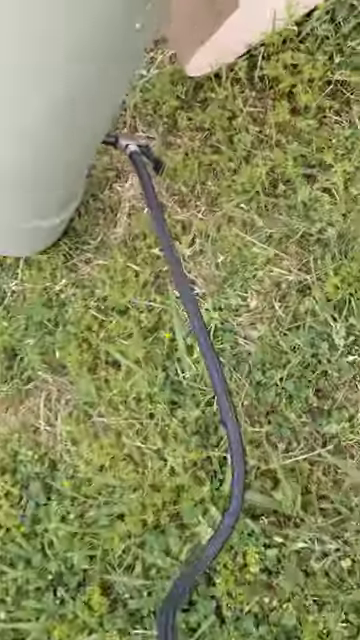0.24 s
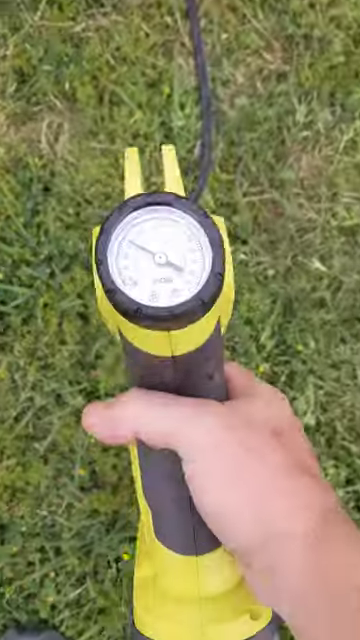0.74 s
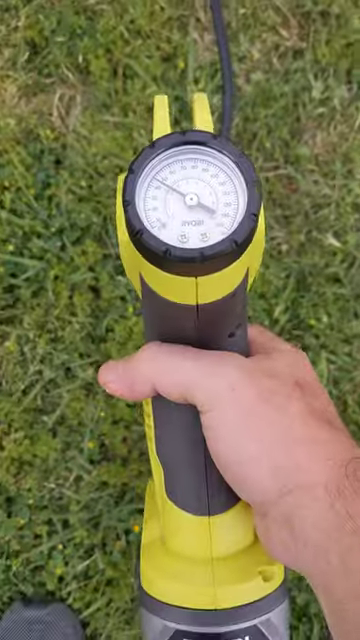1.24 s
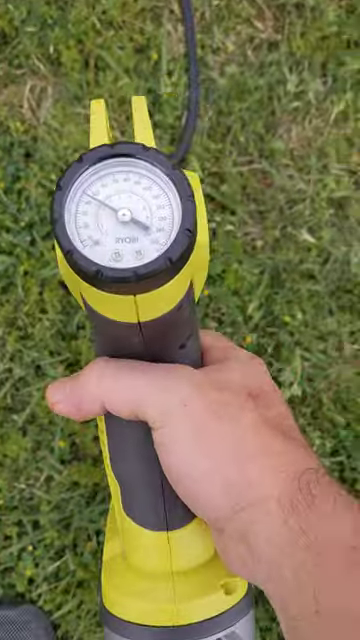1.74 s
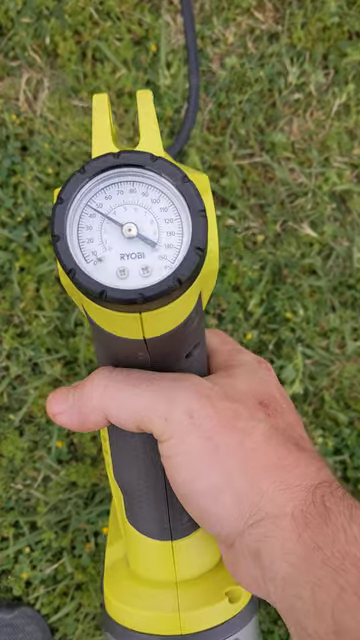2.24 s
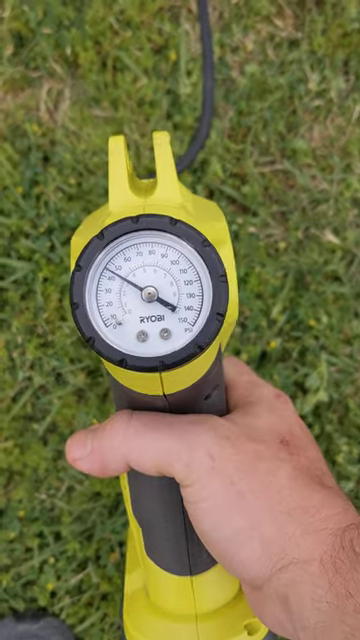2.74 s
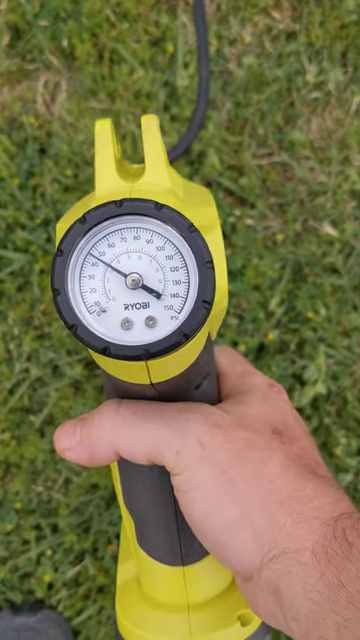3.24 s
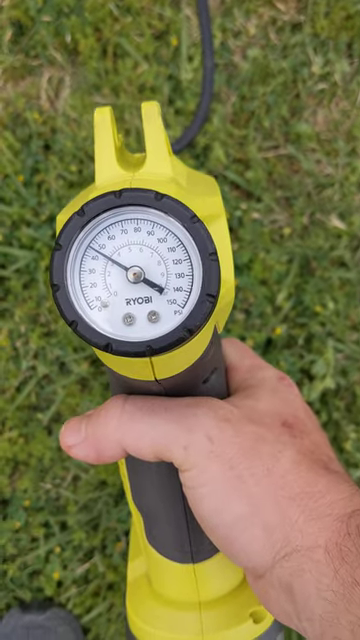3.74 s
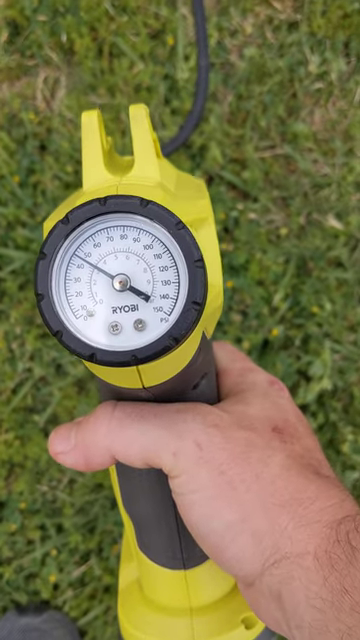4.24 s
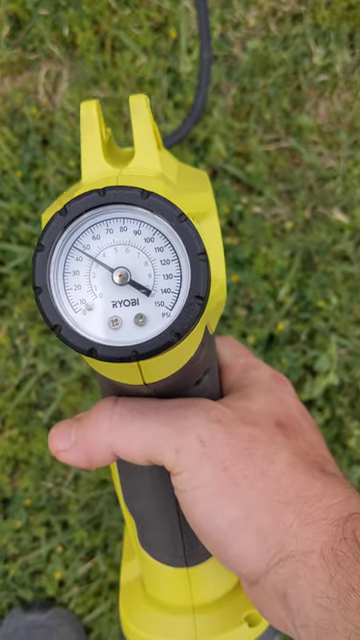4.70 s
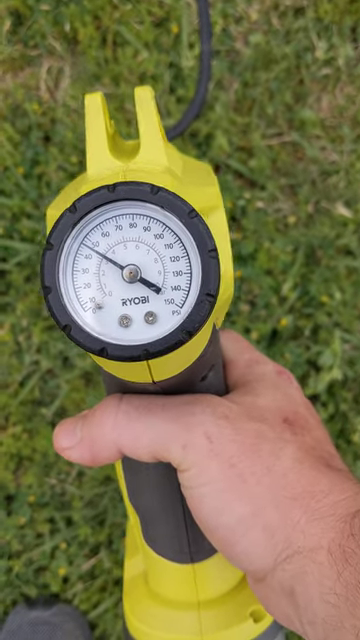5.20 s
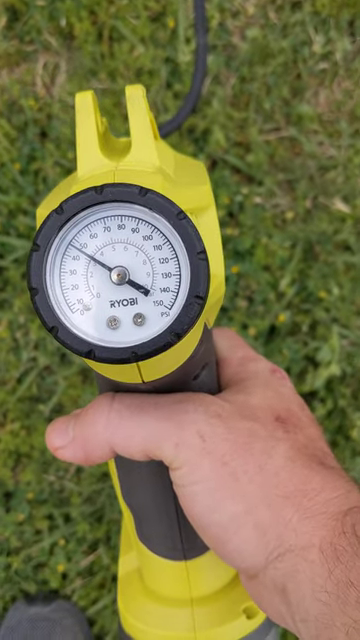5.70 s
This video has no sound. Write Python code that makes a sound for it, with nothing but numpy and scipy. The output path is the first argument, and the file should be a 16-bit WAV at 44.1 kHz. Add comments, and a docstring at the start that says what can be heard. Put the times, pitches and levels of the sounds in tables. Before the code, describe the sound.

Outdoors, a short high hiss leaks from an air hose and dies away as a portable electric air pump starts up. The pump keeps going at one even speed near the microphone, its piston buzzing, gears rattling in a plastic shell and air rushing through. Gusts of wind buffet the microphone throughout, hardest in the first two seconds, and a faint distant drone lies underneath.

```python
"""Air pump on a lawn

Air hisses out where the hose clips on, then a hand-held piston pump starts filling a tank.
Each turn of its crank gives one puff, a round of valve and rod clacks, gear rattle and a surge of hiss.
The pump draws back, then slowly comes nearer. Wind buffets the left and right microphone openings
throughout, over a low, far-off hum."""
import sys
import numpy as np
from scipy.fft import rfft, irfft, next_fast_len
from scipy.io import wavfile
from scipy.ndimage import uniform_filter1d, minimum_filter1d, map_coordinates

SR = 44100
rng = np.random.default_rng(int(sys.argv[2]) if len(sys.argv) > 2 else 0)


def int16_out(signal):
    """Quantize to a 16-bit WAV file."""
    q = np.round(np.clip(np.atleast_2d(signal).T, -1, 1) * 32767)
    wavfile.write(sys.argv[1], SR, q.astype(np.int16))


N = 262836

# Tone of the leak from close by, a little away and far off. Columns: pitch_hz, level_db
LEAK_CLOSE_TONE = [(710, -72), (1200, -36), (3200, -21), (3850, -29), (3970, -17), (4240, -6), (4930, -2),
                   (5980, -9), (6740, -4), (8630, -16), (12600, -22.5), (15800, -24)]
LEAK_AWAY_TONE = [(710, -65), (1200, -27), (2910, -30), (3240, -20), (4240, -19), (4620, -8.5),
                  (5610, -4.5), (6810, -21), (8630, -20), (9210, -30), (11100, -22), (15800, -34)]
LEAK_FAR_TONE = [(290, -66), (500, -28), (2630, -29), (4300, -22), (4690, -11), (5190, -14.5), (5500, -10),
                 (5910, -7), (6260, -12.5), (6540, -17.5), (9250, -27.5), (10200, -23), (11200, -27),
                 (15800, -33)]
# When each of those three tones is heard on its own: time_s
LEAK_TONE_TIMES = [0.068, 0.2, 0.43]
# Gusts of wind on the microphone. Columns: start_s, length_s, left_db, right_db
GUSTS = [(0.0, 0.29, -18.5, -31), (.3, .09, -25.5, -34), (.7, 0.5, -32, -51), (1.03, .1, -9, -25),
         (1.185, 0.078, -27, -21.5), (1.367, 0.11, -27, -27), (1.487, .05, -27, -20.5),
         (1.788, 0.14, -13.5, -37), (1.984, 0.034, -12.5, -28), (2.067, 0.023, -25, -24.5),
         (2.43, 0.043, -25, -36), (2.582, 0.055, -18.5, -27), (2.747, 0.12, -19.5, -38),
         (2.914, 0.041, -14.5, -32), (3.644, 0.018, -19, -35), (3.756, .07, -18, -36),
         (4.609, 0.023, -14, -40), (4.695, 0.16, -20.5, -44), (4.922, 0.28, -21, -42),
         (5.282, 0.073, -20, -44), (5.74, 0.19, -24.5, -42)]
# Tone of the wind's rumble and of the swirls in strong gusts. Columns: pitch_hz, level_db
RUMBLE_TONE = [(22, -42), (40, -10), (60, 4), (130, -2.5), (250, -9.5), (450, -24), (900, -38), (2500, -50)]
SWIRL_TONE = [(80, -3), (300, 2), (500, -4.5), (900, -18.5), (1700, -31), (4000, -65)]
# Sudden slaps of wind on the left side. Columns: start_s, level_db, pitch_hz
SLAPS = [(0.073, 2.5, 200), (0.087, -3, 110), (0.146, -9, 151), (0.242, -1, 172), (0.285, -9, 200),
         (0.468, -15.5, 140), (1.03, 11.5, 115), (1.129, 2.5, 65), (1.78, -6, 130), (1.81, -0.5, 170),
         (1.826, 3, 70), (1.849, -1, 109), (1.887, 10.5, 95)]
# How fast the crank spins. Columns: time_s, turns_per_s
CRANK_SPEED = [(0.7, 35.29), (0.735, 55.13), (0.78, 58.13), (0.85, 59.05), (2, 59.0), (3, 58.94),
               (4, 58.86), (5, 58.81), (5.96, 58.76)]
# How near the pump is (0 is arm's length, 1 is close). Columns: time_s, nearness
NEARNESS = [(0.7, 0.58), (1.1, 0.08), (1.7, 0.12), (2.4, 0.27), (3.1, 0.85), (5.96, 0.89)]
# How the noise swells within one turn. Columns: share_of_turn, rattle_db, hiss_db
TURN_LEVELS = [(0, 7.5, 8), (.15, 10, 1), (.3, 6, 4), (.5, 4.5, 0.5), (.66, 4, 10.5), (.76, 12, 2),
               (.86, -0.5, 9.5), (1, 5, 6.5)]
# Tone of the air rushing through the pump. Columns: pitch_hz, level_db
HISS_TONE = [(3000, -14), (6000, 6.5), (7900, 5), (9000, 4.5), (9800, -0.5), (12300, 0.5), (13100, 2.5),
             (14000, 0.5), (15600, 4)]
# Tone of the gears and motor rattling in the plastic shell. Columns: pitch_hz, level_db
SHELL_TONE = [(150, -1.5), (500, -4), (830, 9.5), (1080, -0.5), (1700, -1), (2200, 4), (2550, 1.5),
              (3100, -6), (3800, -5), (4600, 4), (5800, -1), (6900, -7.5), (9500, -11)]
# Parts that ring when struck; blow_share is how much of the ring comes from the blow, not the gears.
# Columns: pitch_hz, width_hz, far_db, close_db, share_of_turn, blow_share, left_boost_db, left_lag_ms
RINGING_PARTS = [(1374, 570, -4, -4, 0.032, 0.7, 4.5, 0.27), (1892, 87, -6.5, -19.5, .94, 0.35, 2.5, 0.067),
                 (2648, 210, -1.5, -7, 0.019, 1, -3, 0.14), (2825, 240, -4, -4.5, 0.038, 0.52, 2, 0.18),
                 (2660, 310, -7.5, -5, .82, 0.83, -10, 0.11), (3406, 230, -9.5, -6.5, 0.43, 0.32, 1, 0.16),
                 (3600, 180, -10.5, -15, 0.049, 0.51, -1, 0.26),
                 (4132, 390, -5, -6.5, .33, 0.39, -1.5, 0.254), (4510, 120, -25, -6.5, 0.88, 0.61, 6, 0.22),
                 (4939, 206, -3.5, -7, 0.27, 0.33, -4, 0.17), (5300, 134, -21, -8.5, .14, 0.9, 5, 0.19),
                 (6280, 490, -9, -13.5, 0.36, 0.26, 2, 0.2), (7680, 890, -13, -9, 1, 0.22, 2, 0.18),
                 (8650, 210, -27, -16.5, .88, 0.45, 14, 0.14)]
# Tone of one puff through the pump body, on each side. Columns: pitch_hz, level_db
PUFF_LEFT_TONE = [(30, -39), (59, -13), (118, -9.5), (200, -15.5), (310, -8.5), (412, -9), (471, -21.5),
                  (530, -10.5), (650, -5), (766, -5), (825, 0.5), (884, -5), (950, -21.5), (1110, -32.5),
                  (1400, -12.5), (1900, -54.5)]
PUFF_RIGHT_TONE = [(30, -40), (59, -14.5), (118, -13), (220, -18), (400, -11), (530, -7.5), (700, -15.5),
                   (825, -13.5), (1000, -25.5), (1120, -43), (1354, -20), (1590, -17.5), (1800, -31.5),
                   (3000, -63)]

SWITCH_ON_S, FIRST_PUFF_S = 0.678, 0.7033
TIME_S = np.arange(N) / SR


def amp(db):
    """Turn decibels into a number to multiply by."""
    return 10 ** (np.asarray(db) / 20)


def unit(x):
    """Scale a sound so that its average power is 1."""
    return x / np.sqrt(np.mean(x ** 2) + 1e-20)


def tone_gain(tone, hz):
    """Look up how strongly a tone table passes each pitch."""
    pitch_hz, level_db = np.transpose(tone)
    return amp(np.interp(np.log(hz + 1), np.log(pitch_hz + 1), level_db))


def curves(table, at):
    """Join a table's rows with straight lines: one curve for each column after the first."""
    places, *columns = np.transpose(table)
    return [np.interp(at, places, column) for column in columns]


def filtered(x, response):
    """Change the strength and timing of each pitch in x by response(hz)."""
    size = 2 * next_fast_len(N // 2 + SR // 4)
    return irfft(rfft(x, size) * response(np.fft.rfftfreq(size, 1 / SR)), size)[..., :N]


def coloured(noise, tone):
    """Give noise the shape of a tone table, at power 1."""
    return unit(filtered(noise, lambda hz: tone_gain(tone, hz)))


def ring_after(tone, hz):
    """A filter response with this tone that rings only after a blow, never before it."""
    cepstrum = irfft(np.log(tone_gain(tone, hz)))
    half = len(cepstrum) // 2
    cepstrum[1:half] *= 2  # move the early half of the ring onto the late half
    cepstrum[half + 1:] = 0
    return np.exp(rfft(cepstrum))


def delay(hz, lag_ms):
    """A filter response that makes the left side later than the right by lag_ms."""
    half = np.exp(-1j * np.pi * hz * lag_ms / 1000)
    return np.array([half, half.conj()])


def arriving(x, lag_ms):
    """A sound as it reaches the two sides, the left one later."""
    return filtered(x, lambda hz: delay(hz, lag_ms))


def panned(left_boost_db):
    """Left and right gains; a boost below zero makes the right side louder."""
    return amp(left_boost_db * np.array([[0.5], [-0.5]]))


def blend(a, b, share):
    """Mix two unrelated sounds; the first gets this share of the power."""
    return np.sqrt(share) * a + np.sqrt(1 - share) * b


def stereo_noise(lag_ms, direct_share):
    """White noise, partly straight from the source and partly scattered."""
    direct = arriving(rng.standard_normal(N), lag_ms)
    return blend(direct, rng.standard_normal((2, N)), direct_share)


def resonance(x, pitch_hz, width_hz, lag_ms):
    """Make x ring in a narrow band around one pitch, at power 1."""
    def band(hz):
        return 1j * hz * width_hz / (pitch_hz ** 2 - hz ** 2 + 1j * hz * width_hz)
    return unit(filtered(x, lambda hz: band(hz) ** 2 * delay(hz, lag_ms)))


def swell(peak_s, hold_s, rise_db_per_s, fade_db_per_s):
    """A level in dB that climbs to 0 at peak_s, holds, then fades."""
    age_s = TIME_S - peak_s
    level_db = rise_db_per_s * np.minimum(age_s, 0) - fade_db_per_s * np.maximum(age_s - hold_s, 0)
    return np.maximum(level_db, -120)


def wobble(per_s):
    """A smooth curve through per_s random values each second."""
    return map_coordinates(rng.standard_normal(int(N * per_s / SR) + 4), [TIME_S * per_s])


def hose_leak():
    """Air escapes where the hose clips on; the hiss thins and fades as the microphone moves away."""
    jet = stereo_noise(lag_ms=0.305, direct_share=0.12)
    tones = (LEAK_CLOSE_TONE, LEAK_AWAY_TONE, LEAK_FAR_TONE)
    fades = [np.interp(TIME_S, LEAK_TONE_TIMES, row) for row in np.eye(3)]
    hiss = sum(fade * coloured(jet, tone) for fade, tone in zip(fades, tones))
    level_db = -19 + swell(peak_s=0.04, hold_s=0, rise_db_per_s=82, fade_db_per_s=18.3)
    return amp(level_db) * hiss * panned(left_boost_db=-2.1)


def wind():
    """Gusts over a light breeze buffet each side of the microphone; strong ones shed higher swirls."""
    breeze_db = (-33, -38.5)  # left, right
    wind_db = np.array([side_db + 4 * wobble(per_s=9.6) for side_db in breeze_db])
    for start_s, length_s, left_db, right_db in GUSTS:
        shape_db = swell(start_s, length_s, rise_db_per_s=400, fade_db_per_s=190)
        wind_db = np.maximum(wind_db, np.array([[left_db], [right_db]]) + shape_db)
    rumble = amp(wind_db) * coloured(rng.standard_normal((2, N)), RUMBLE_TONE)
    swirl_db = 1.58 * wind_db - 4  # swirls grow faster than the rumble
    swirls = amp(swirl_db) * coloured(rng.standard_normal((2, N)), SWIRL_TONE)
    return rumble + swirls


def distant_hum():
    """A low, far-off drone lies under everything."""
    noise = stereo_noise(lag_ms=0, direct_share=0.85)
    return amp(-38.5) * resonance(noise, pitch_hz=115, width_hz=21, lag_ms=0)


def wind_slaps():
    """Sudden gusts hit the left side: each is one low push and a brief burst of swirls."""
    rise_s, decay_s = 0.00075, 0.0053
    out = np.zeros((2, N))
    swirls = coloured(rng.standard_normal(N), SWIRL_TONE)
    for start_s, level_db, pitch_hz in SLAPS:
        age_s = np.maximum(TIME_S - start_s, 0)
        shape = (1 - np.exp(-age_s / rise_s)) * np.exp(-age_s / decay_s)
        push = np.sin(2 * np.pi * pitch_hz * age_s)
        out[0] += amp(level_db) * shape * (push + 0.4 * swirls)
    return out


def air_hiss(surge_db, nearness, pace, running_s):
    """Rushing air surges with each turn, and is a little louder as it first fills the empty hose."""
    first_rush_db = 2.5 * np.exp(-(running_s / 0.14) ** 2)
    level_db = -32 + 3 * nearness + 32 * pace + first_rush_db + surge_db
    air = coloured(stereo_noise(lag_ms=0.216, direct_share=0.22), HISS_TONE)
    return amp(level_db) * air * panned(left_boost_db=-1.5)


def gear_noise(turns):
    """The same rough teeth meet in every turn, over the fresh noise of the motor's brushes and fan."""
    roughness = rng.standard_normal((3, 750))  # rows: both sides, left, right
    teeth = np.array([map_coordinates(row, [turns % 1 * len(row)], mode="grid-wrap")
                      for row in roughness])
    grinding = blend(teeth[0], teeth[1:], share=0.48)
    motor = stereo_noise(lag_ms=0, direct_share=0.44)
    return blend(grinding, motor, share=0.26)


def shell_rattle(turns, rattle_db):
    """The gears and motor shake the plastic shell."""
    shaking = amp(rattle_db) * gear_noise(turns)
    return amp(-22) * coloured(arriving(shaking, lag_ms=0.18), SHELL_TONE)


def blows(turns, share_of_turn, jitter_ms, scatter_db):
    """One tap at the same point of every turn, each a little different in timing and strength."""
    count = int(turns[-1]) + 1
    lateness, strength = rng.standard_normal((count, 2)).T
    on_time = np.interp(np.arange(count) + share_of_turn, turns, np.arange(N), right=2 * N)
    centres = on_time + lateness * jitter_ms * SR / 1000
    # Spread each tap over 16 samples so that its centre can fall between two of them.
    samples = centres.astype(int)[:, None] + np.arange(-7, 9)
    gap = samples - centres[:, None]
    shape = np.sinc(gap) * np.cos(np.pi * gap / 16) ** 2
    taps = amp(scatter_db * strength)[:, None] * shape
    return np.bincount(samples.ravel(), taps.ravel(), N)[:N]


def clacks(turns, rattle_db, nearness):
    """Each part is struck at its own point in the turn and kept buzzing by the gears."""
    gears = amp(rattle_db) * gear_noise(turns)
    out = np.zeros((2, N))
    for pitch_hz, width_hz, far_db, close_db, share_of_turn, blow_share, left_db, lag_ms in RINGING_PARTS:
        strikes = unit(blows(turns, share_of_turn, jitter_ms=0.023, scatter_db=0.6))
        force = blend(strikes, gears, blow_share)
        gain = amp(far_db + nearness * (close_db - far_db)) * panned(left_db)
        out += gain * resonance(force, pitch_hz, width_hz, lag_ms)
    return amp(-24) * out


def piston_puffs(turns, nearness, pace):
    """Once a turn, the piston's gulp of air makes the pump body ring."""
    gulps = -blows(turns, share_of_turn=0, jitter_ms=0.01, scatter_db=-0.7)
    tones = (PUFF_LEFT_TONE, PUFF_RIGHT_TONE)
    body = filtered(gulps, lambda hz: np.array([ring_after(tone, hz) for tone in tones]))
    level_db = -20.5 + 1.05 * nearness + 8 * pace
    return amp(level_db) * unit(arriving(body, lag_ms=0.18))


def valve_chatter(turns):
    """With no pressure behind it yet, the valve slaps open and shut."""
    shutting = blows(turns, share_of_turn=0.0284, jitter_ms=0.02, scatter_db=2.5)
    opening = amp(-14) * blows(turns, share_of_turn=0.92, jitter_ms=0.02, scatter_db=2)
    ring = resonance(shutting + opening, pitch_hz=2630, width_hz=240, lag_ms=0.05)
    level_db = -26 + swell(peak_s=0.76, hold_s=0.17, rise_db_per_s=90, fade_db_per_s=56)
    return amp(level_db) * ring


def pump():
    """One crank times all the pump's sounds; its speed and the pump's nearness shape their levels."""
    speed = curves(CRANK_SPEED, TIME_S)[0]
    turns = np.cumsum(speed) / SR
    turns -= np.interp(FIRST_PUFF_S, TIME_S, turns)  # count from the first puff
    pace = np.log10(speed / speed.max())  # 0 at top speed, below 0 when slower
    nearness = curves(NEARNESS, TIME_S)[0]
    running_s = np.maximum(TIME_S - SWITCH_ON_S, 0)
    rattle_db, surge_db = curves(TURN_LEVELS, turns % 1)
    hiss = air_hiss(surge_db, nearness, pace, running_s)
    rattle = amp(8 * pace) * (shell_rattle(turns, rattle_db) + clacks(turns, rattle_db, nearness))
    puffs = piston_puffs(turns, nearness, pace)
    fade_in = np.minimum(running_s / 0.019, 1)  # the gears take up their slack
    return fade_in * (hiss + rattle + puffs + valve_chatter(turns))


def limiter(x):
    """A loud peak turns its side down at once, and the other a little; the level holds, then recovers."""
    ceiling_db, recover_db_per_s, other_side_share = -0.56, 71, 0.14
    hold = int(0.05 * SR)
    over_db = np.maximum(20 * np.log10(np.abs(x) + 1e-9) - ceiling_db, 0)
    held_db = -minimum_filter1d(-over_db, hold, origin=(hold - 1) // 2)
    recovery_db = recover_db_per_s * TIME_S
    cut_db = np.maximum.accumulate(held_db + recovery_db, axis=1) - recovery_db
    cut_db = np.maximum(cut_db, other_side_share * cut_db[::-1])
    smooth_cut_db = uniform_filter1d(cut_db, size=64)
    return x * amp(-smooth_cut_db)


def scene():
    """The pump and the sounds around it add up in open air."""
    return pump() + hose_leak() + wind() + distant_hum() + wind_slaps()


def record(dry):
    """The recorder cuts deep bass, dips under hard wind slaps, rounds off peaks and drops the top treble."""
    bass_hz, top_hz = 32, 15780
    trimmed = filtered(dry, lambda hz: hz ** 6 / (hz ** 6 + bass_hz ** 6))
    limited = limiter(trimmed)
    rounded = limited / (1 + np.abs(limited) ** 6) ** (1 / 6)
    return filtered(rounded, lambda hz: hz < top_hz)


dry = scene()
out = record(dry)
int16_out(out)
```